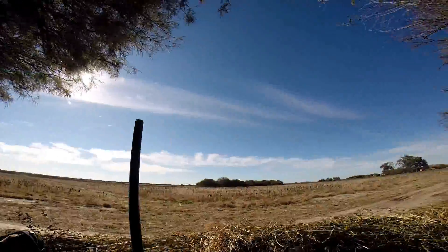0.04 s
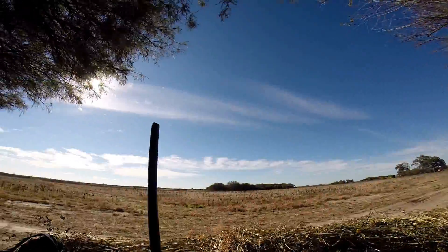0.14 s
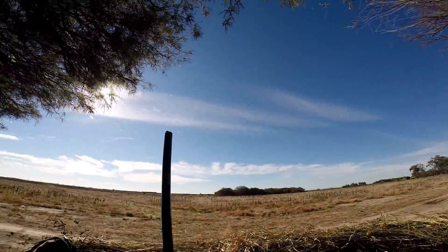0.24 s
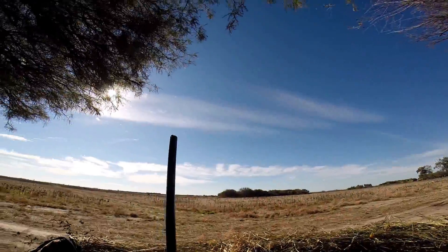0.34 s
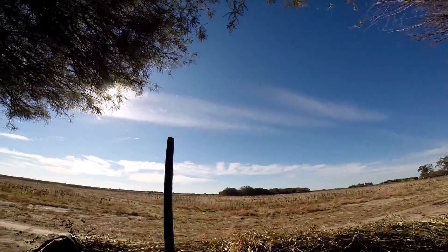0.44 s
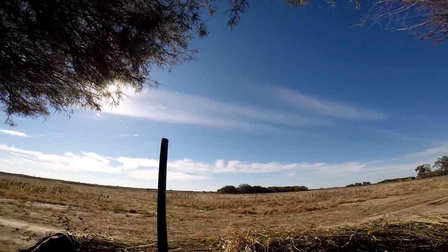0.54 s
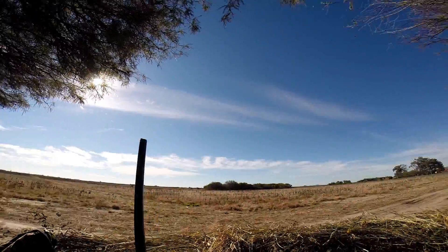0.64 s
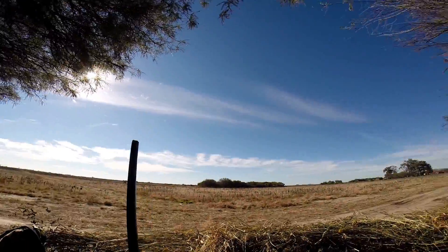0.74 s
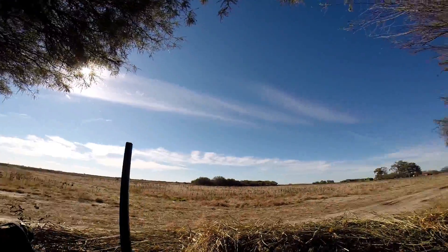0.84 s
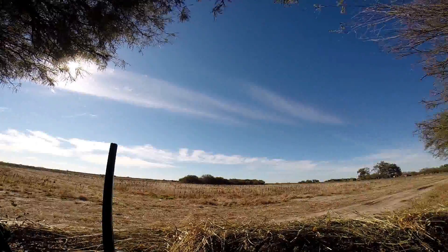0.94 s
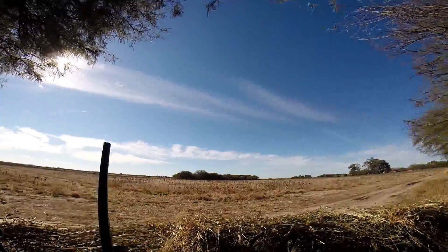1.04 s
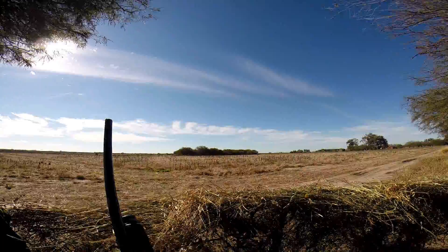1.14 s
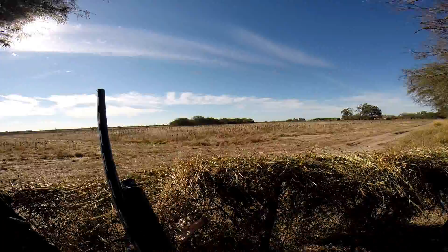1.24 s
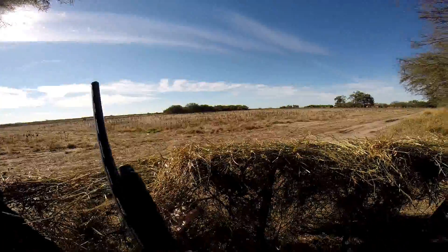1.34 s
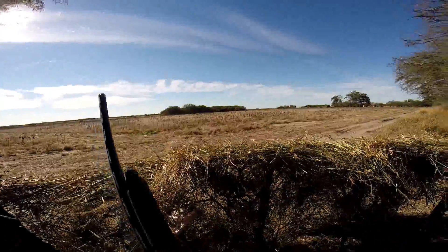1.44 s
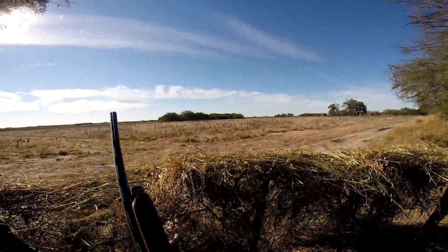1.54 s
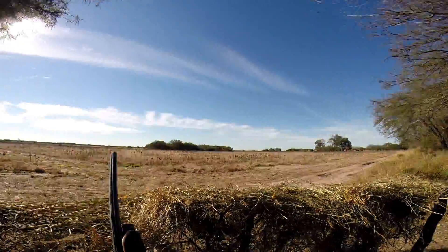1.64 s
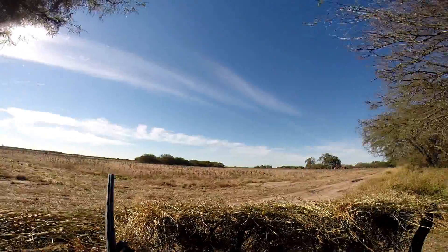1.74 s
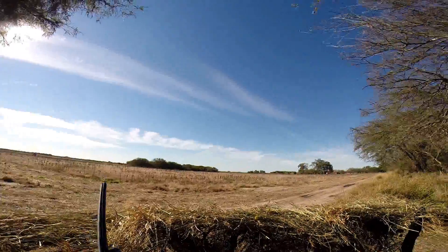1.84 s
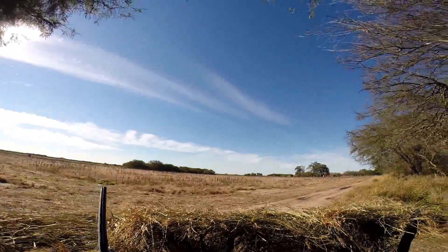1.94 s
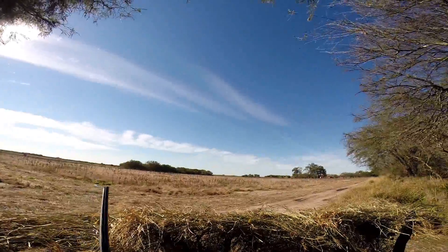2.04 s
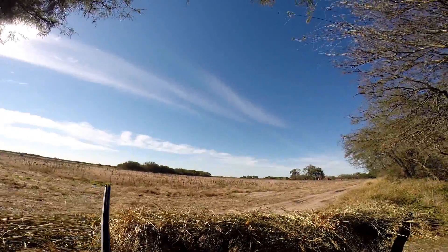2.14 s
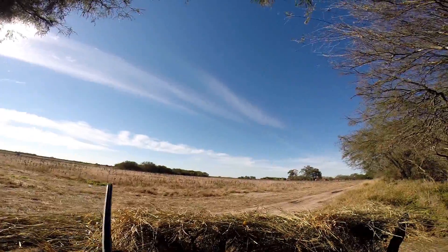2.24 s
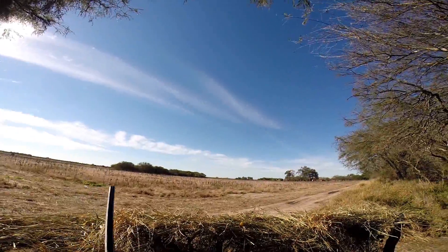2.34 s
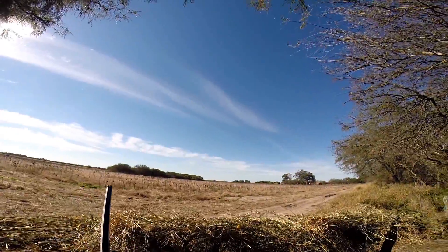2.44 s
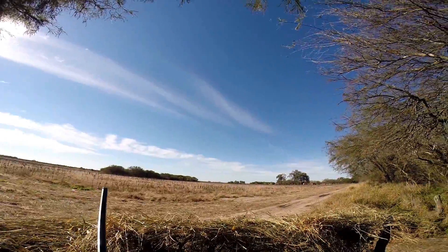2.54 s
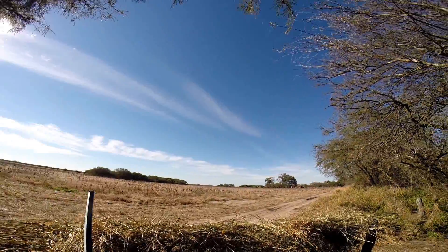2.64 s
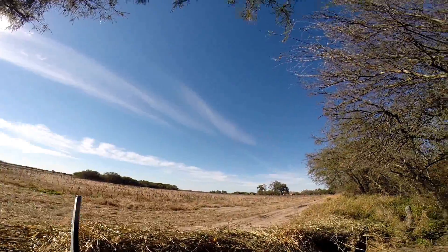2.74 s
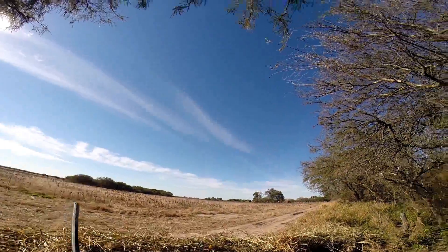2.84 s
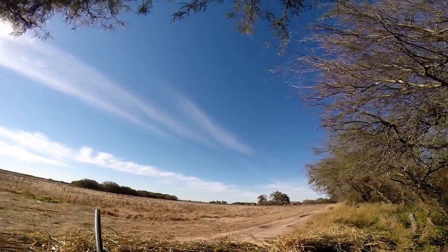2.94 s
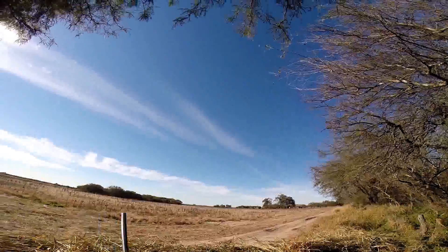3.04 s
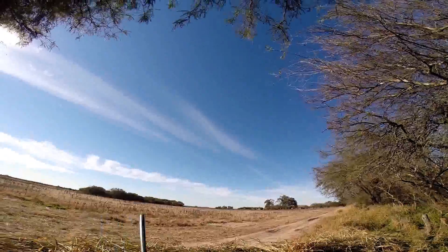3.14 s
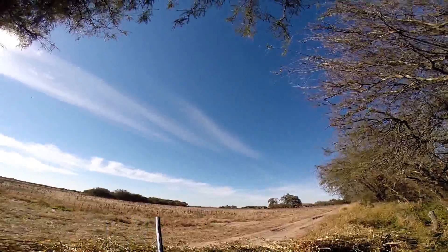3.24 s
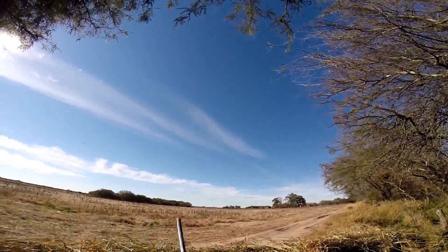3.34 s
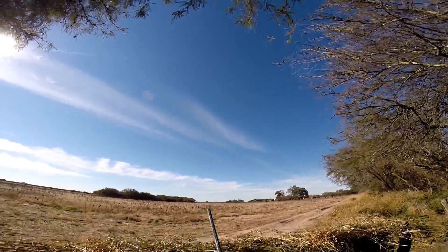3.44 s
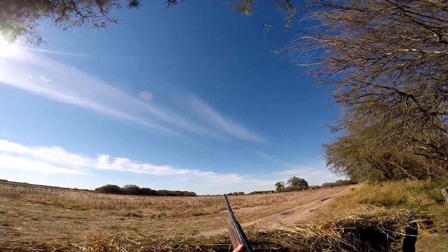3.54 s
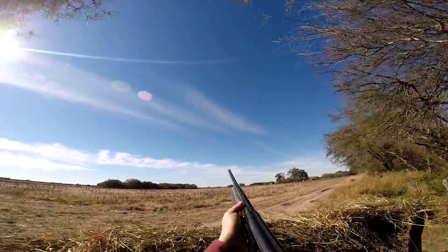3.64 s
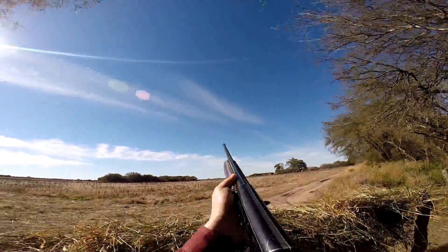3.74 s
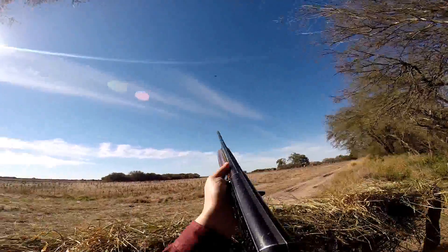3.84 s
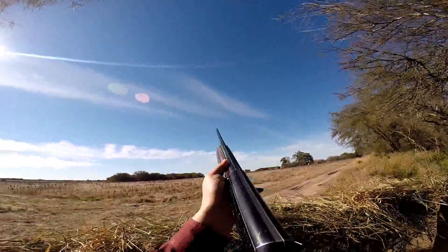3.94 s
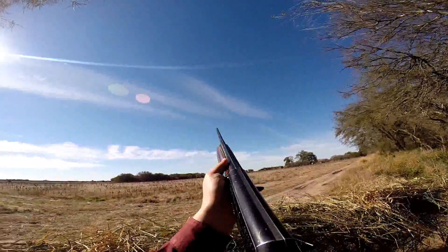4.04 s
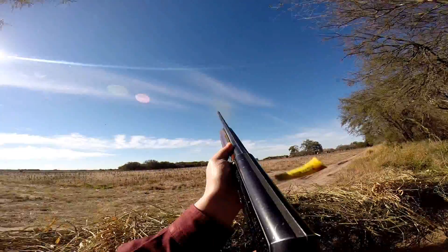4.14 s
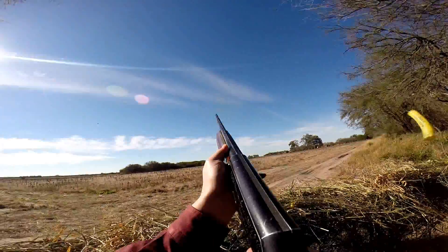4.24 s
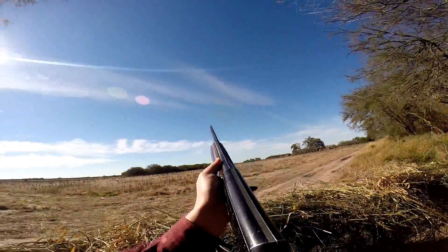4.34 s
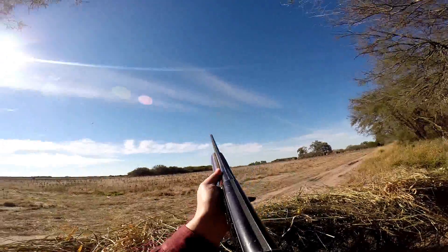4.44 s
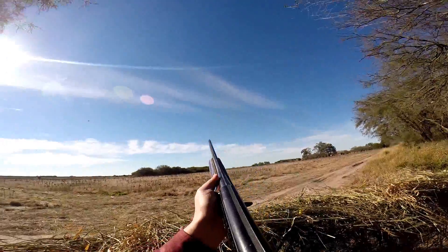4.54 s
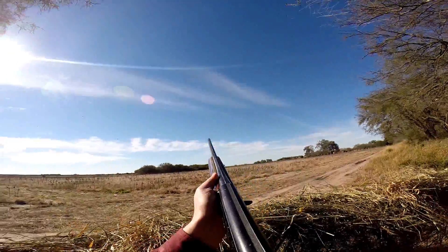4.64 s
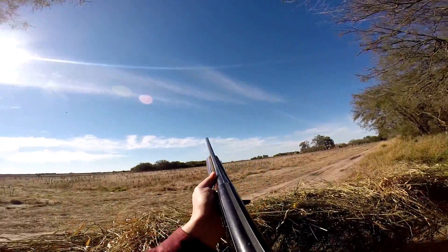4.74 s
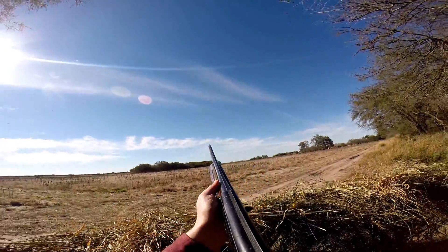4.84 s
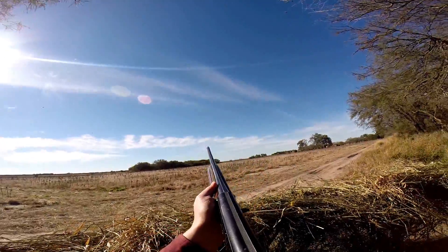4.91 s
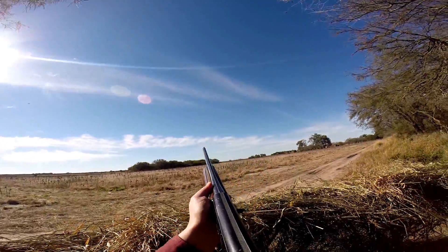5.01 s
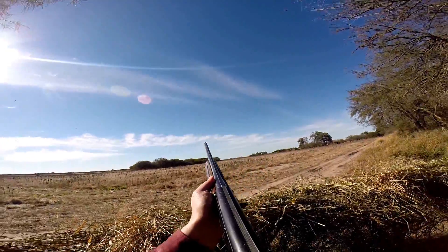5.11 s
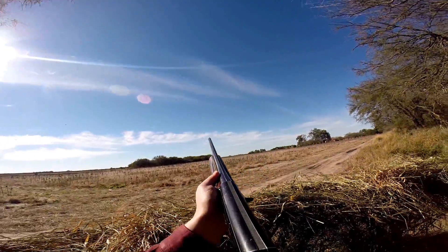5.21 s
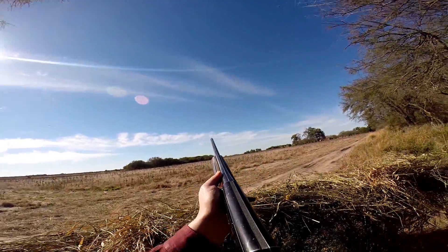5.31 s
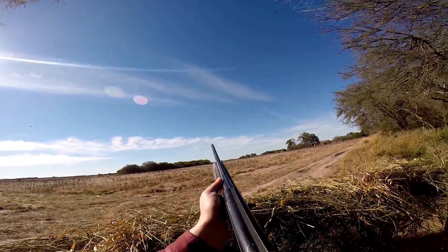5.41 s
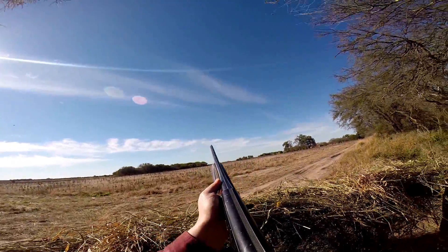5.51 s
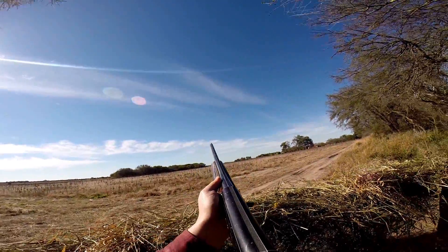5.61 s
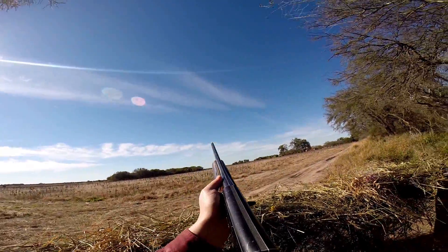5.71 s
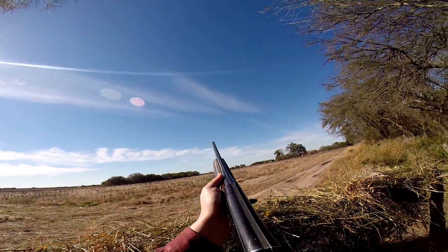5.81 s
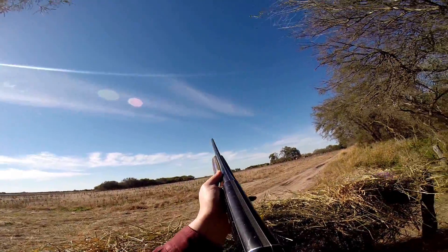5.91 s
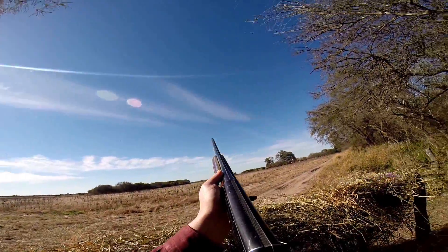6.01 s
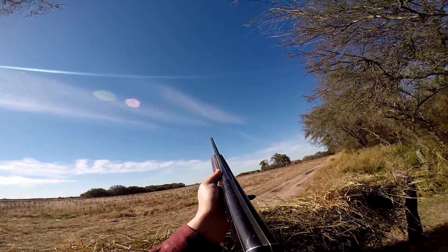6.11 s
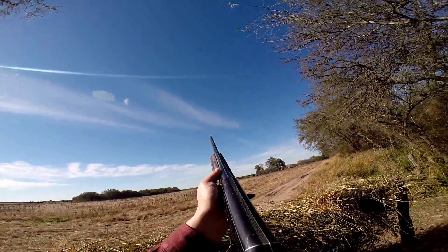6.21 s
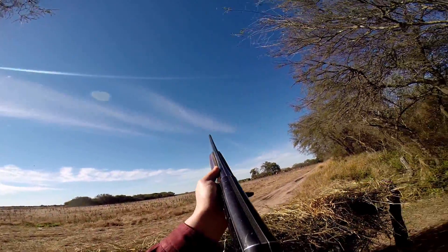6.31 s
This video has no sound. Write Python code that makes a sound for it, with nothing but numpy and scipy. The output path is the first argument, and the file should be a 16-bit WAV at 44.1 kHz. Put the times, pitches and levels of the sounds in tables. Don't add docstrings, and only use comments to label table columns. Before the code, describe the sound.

Muffled wind thumps and hiss in an open field; a far gunshot, small metal clicks, then a deafening close shotgun shot and settling rustle.

```python
import sys
import numpy as np
from scipy import signal
from scipy.fft import rfft, irfft
from scipy.io import wavfile
from scipy.ndimage import uniform_filter1d

SR = 44100
rng = np.random.default_rng(int(sys.argv[2]) if len(sys.argv) > 2 else 0)


def nominal_scale(level):
    x = np.asarray(level, float) / 20
    return 10 ** x


def unload_wav(signal):
    wavfile.write(
        sys.argv[1],
        SR,
        np.round(np.clip(np.atleast_2d(signal).T, -1, 1) * 32767).astype(np.int16),
    )


N = 280901

# pitch_hz, width_hz, level_db
HOUSING_MODES = [(200, 170, -10), (850, 350, -5), (1600, 330, -5.5), (2410, 410, -0.5), (2890, 300, -0.5),
                 (3700, 570, -2.5), (4640, 480, -6.5), (5880, 900, -6.5), (6500, 900, -22.5),
                 (7350, 430, -20), (8300, 190, -22.5), (9900, 1300, -17), (10950, 2300, -22.5),
                 (13000, 4600, -32.5)]
# start_s, level_db, length_ms, strongest pitch_hz, fall_db_per_octave
BLAST_FRONTS = [
    (4.22595, 0, .05, 3000, 1.5),
]
# start_s, level_db, length_ms
PUSHES = [
    (1.322, -35.5, 1.1),
    (4.2292, -1, 0.19),
    (4.2297, -13, 0.54),
]
# start_s, peak_db, hold_ms, t60_ms, pitch_hz
PANEL_RINGS = [(1.3216, -29, 1.1, 8.9, 850), (1.322, -24.5, 1.6, 9.7, 1630), (1.323, -42, 2.2, 25, 4750),
               (1.3345, -45, 4.2, 30, 5730), (1.3465, -43, 4, 30, 5560), (4.22654, -13, 1.1, 5, 2890),
               (4.22862, -2.5, 2.5, 8, 2890), (4.2292, -6.5, 2.1, 8, 4580), (4.2461, -8, 0, 7, 2890),
               (1.8648, -48.5, 2.5, 14, 960), (4.398, -41.5, 1, 18, 950), (2.3535, -61, 2.2, 22, 4530),
               (2.3625, -61, 4.5, 30, 3800), (2.4455, -60, 4.5, 30, 3800)]
# start_s, level_db, t60_ms, strongest pitch_hz
OWN_SHOT = [
    (4.22, -53.5, 22, 3500),
    (4.2241, -10, 36, 5600),
    (4.2266, -17.5, 20, 4000),
    (4.2286, -5.5, 24, 2600),
    (4.2335, -14, 7, 3600),
    (4.2372, -19, 11, 2000),
    (4.2462, -16, 20, 4000),
    (4.2488, -19, 38, 3600),
]
# start_s, level_db, t60_ms,
# strongest pitch_hz, fall_db_per_octave
FAR_SHOT = [
    (1.322, -32.5, 32, 2900, 23),
    (1.322, -36, 39, 4700, 2),
    (1.3345, -34, 62, 2970, 13),
    (1.334, -52, 52, 5000, 13),
    (1.3405, -36, 50, 2500, 25),
    (1.347, -37.5, 36, 1200, 26),
    (1.355, -34, 32, 2900, 34),
    (1.36, -42, 55, 1300, 13),
    (1.325, -46, 410, 2400, -0.5),
]
# start_s, level_db, t60_ms, strongest pitch_hz, fall_db_per_octave
FIELD_ECHOES = [
    (4.237, -27, 160, 3374, 0.65),
    (4.245, -33.5, 700, 2600, 3),
    (4.25, -35.5, 850, 1654, 10),
    (4.25, -34, 650, 5400, 4),
]
# start_s, level_db, t60_ms, strongest pitch_hz, fall_db_per_octave
ACTION = [
    (4.3125, -21, 55, 4640, 7),
    (4.3214, -8, 26, 3800, 9),
    (4.327, -13, 36, 4300, 6),
    (4.336, -27, 47, 2300, 0),
    (4.3985, -35, 24, 6000, 3),
    (5.032, -48.5, 27, 1500, 10),
    (5.043, -60, 25, 3515, 0.51),
]
# start_s, level_db, t60_ms, strongest pitch_hz, extra treble_db
CLICKS = [(0.225, -52.5, 20, 2900, 8), (1.8046, -44.5, 19, 3000, 21), (1.864, -34, 14, 1850, 22),
          (2.2289, -31.5, 11, 2900, 5), (2.262, -32.5, 13.5, 3740, 0), (2.4012, -38.5, 15, 3800, 8),
          (2.437, -47, 30, 3700, 15), (2.4551, -38, 23, 3100, 10), (2.6288, -41.5, 12, 3000, -6),
          (2.6358, -45, 8, 3070, 3), (2.6503, -48.5, 10, 2800, -3), (2.682, -55, 30, 2400, 12)]
# start_s, level_db, t60_ms, strongest pitch_hz
SNAPS = [(0.072, -49, 30, 2280), (0.0954, -50, 25, 2860), (1.1675, -46, 22, 1750), (1.187, -57, 30, 2320),
         (1.641, -52, 45, 2600), (1.6906, -56, 40, 3300), (1.7044, -60, 60, 3700), (1.835, -51, 20, 2500),
         (2.0564, -53.5, 40, 2890), (2.239, -52, 82, 2700), (2.3044, -55, 22, 2900), (2.351, -53, 39, 3930),
         (2.447, -55, 100, 3750), (2.405, -53, 60, 1600), (2.415, -54, 25, 2900), (2.4684, -52, 23, 3300),
         (2.607, -59, 70, 2500), (3.8705, -52, 18, 1980), (3.9823, -51, 26, 1970)]
# start_s, level_db, t60_ms, strongest pitch_hz,
# fall_db_per_octave
SLOW_SWELLS = [
    (1.97, -60.5, 540, 2980, 19),
    (5.13, -61.5, 800, 1974, 3.5),
]
# peak_s, peak_db, half_length_s
RUSTLE = [
    (0, -69.5, .1),
    (.45, -74, 0.3),
    (1.75, -68.5, 0.28),
    (2.4, -70.5, 0.16),
    (3.8, -68.5, .2),
    (5, -73.5, .4),
]
# peak_s, peak_db, half_length_s
GUSTS = [(0, -47.5, 0.048), (.25, -47, 0.14), (.52, -48.5, .1), (.86, -50.5, 0.13), (1.28, -44.5, .07),
         (1.79, -40.5, 0.041), (1.7, -48, 0.14), (2.09, -49.5, 0.032), (2.26, -48, 0.027),
         (2.37, -49.5, 0.046), (2.49, -45.5, 0.056), (2.8, -51, 0.088), (2.95, -49.5, .06),
         (3.12, -51.5, 0.086), (3.48, -34, 0.024), (3.41, -44.5, 0.04), (3.6, -42, 0.056), (3.88, -41, 0.2),
         (4.17, -42, 0.14), (4.6, -47, 0.21), (5, -47.5, .2), (5.35, -48, .12), (5.61, -48.5, 0.039),
         (5.77, -45.5, .06), (5.92, -47.5, .04), (6.06, -45, 0.039), (6.2, -52, .12)]
# pitch_hz, level_db (per Hz)
THUMP_SPECTRUM = [(5.9, -29.5), (10, 1), (23, -2), (47, -1.5), (61, -13), (86, -25), (130, -30), (170, -60),
                  (290, -120)]
# pitch_hz, level_db, wobble_radians, wobble_rate_hz
WHINES = [
    (5846, -88, 0, 30),
    (8780, -83, 0, 30),
    (11712, -83.5, 1.1, 29),
]
# pitch_hz, level_db (per Hz)
HISS_SPECTRUM = [(41, -29.5), (70, -2), (90, -6.5), (230, -10), (800, -17.5), (1700, -21), (3500, -27),
                 (6000, -33), (8500, -38), (11000, -42), (13000, -42.5), (15400, -53.5)]
# time_s, level_db
HUSH = [
    (4.207, 0),
    (4.21, -14),
    (4.226, -14),
    (4.23, 0),
]


def evened(x):
    return x / np.sqrt(np.mean(x ** 2) + 1e-20)


def add(mix, start_s, sound):
    part = mix[round(start_s * SR):][:len(sound)]
    part += sound[:len(part)]


def curve(rows):
    return np.interp(np.arange(N) / SR, *np.transpose(list(rows)))


def coloured(spectrum):
    hz = np.fft.rfftfreq(N, 1 / SR)
    point_hz, level_db = np.transpose(spectrum)
    gain = nominal_scale(np.interp(np.log(hz + 1), np.log(point_hz + 1), level_db))
    return evened(irfft(rfft(rng.standard_normal(N)) * gain, N))


def swells(rows, bed_db):
    t = np.arange(N) / SR
    power = nominal_scale(bed_db) ** 2
    for peak_s, peak_db, half_s in rows:
        power = power + nominal_scale(peak_db) ** 2 * np.exp(-((t - peak_s) / half_s) ** 2)
    return np.sqrt(power)


def mode(x, hz, width_hz):
    r = np.exp(-np.pi * width_hz / SR)
    feedback = [1, -2 * r * np.cos(2 * np.pi * hz / SR), r * r]
    return signal.lfilter([(1 - r * r) / 2, 0, (r * r - 1) / 2], feedback, x)


def housing(x, centre_hz=2400, fall_db=3):
    out = 0
    for hz, width_hz, level_db in HOUSING_MODES:
        gain = nominal_scale(level_db - fall_db * abs(np.log2(hz / centre_hz)))
        out = out + gain * mode(x, hz, width_hz)
    return out


def burst(noise, lumps, level_db, rise_ms, t60_ms, centre_hz, fall_db, treble_db=0, blur=1):
    scatter_db, bass_loss_db, treble_dies = 1.5, -7, 0.36
    t_ms = np.arange(int((rise_ms + 1.2 * t60_ms + 15) * SR / 1000)) / SR * 1000
    rise = np.sin(np.pi / 2 * np.minimum(t_ms / rise_ms, 1)) ** 2
    after_ms = np.maximum(t_ms - rise_ms, 0)
    drive = noise[:len(t_ms)] * nominal_scale(scatter_db * lumps[:len(t_ms)])
    out, power = 0, 0
    for hz, width_hz, mode_db in HOUSING_MODES:
        mode_db = mode_db - fall_db * abs(np.log2(hz / centre_hz))
        mode_db = mode_db + treble_db * (hz > 6000) + bass_loss_db * (hz < 1200)
        share = nominal_scale(mode_db) * np.sqrt(width_hz)
        shape = rise * nominal_scale(-60 * after_ms / t60_ms * (hz / 3000) ** treble_dies)
        ring = mode(drive * shape, hz, blur * width_hz)
        ring = mode(ring, hz, blur * width_hz)
        out = out + share * ring * np.linalg.norm(shape) / np.linalg.norm(ring)
        power += share ** 2
    return nominal_scale(level_db) * out / np.sqrt(power)


def bursts(rows):
    out = np.zeros(N)
    noise = rng.standard_normal(N + 2 * SR)
    lumps = evened(uniform_filter1d(rng.standard_normal(N + 2 * SR), 90))
    for k, (start_s, *settings) in enumerate(rows):
        first = round(start_s * 100) * SR // 100 + 97 * k
        add(out, start_s, burst(noise[first:], lumps[first:], *settings))
    return out


def swelling(rows, *colour):
    timed = []
    for start_s, level_db, t60_ms, *own in rows:
        rise_ms = .45 + .018 * t60_ms
        timed.append((start_s, level_db, rise_ms, t60_ms, *own, *colour))
    return bursts(timed)


def blasts():
    own = swelling(OWN_SHOT, 3.5, 2, 1.3)
    far = swelling(FAR_SHOT, -5)
    field = swelling(FIELD_ECHOES, 0, 2.1)
    return own + far + field


def fronts():
    click_lag_s, click_gain_db, click_ms, click_fall_db = .0008, 1.5, .13, 11
    rows = list(BLAST_FRONTS)
    for start_s, level_db, _, hz, _ in CLICKS:
        rows.append((start_s + click_lag_s, level_db + click_gain_db, click_ms, hz, click_fall_db))
    out = np.zeros(N)
    for start_s, level_db, length_ms, centre_hz, fall_db in rows:
        u = np.arange(1500) / SR * 1000 / length_ms
        ring = housing((1 - u) * np.exp(-u), centre_hz, fall_db)
        add(out, start_s, nominal_scale(level_db) * ring / abs(ring).max())
    return out


def pushes():
    out = np.zeros(N)
    for start_s, level_db, length_ms in PUSHES:
        u = np.arange(1500) / SR * 1000 / length_ms
        add(out, start_s, -nominal_scale(level_db) * 2 * u * (2 - u) * np.exp(-u))
    return out


def panel_rings():
    rise_ms = 1.
    t_ms = np.arange(2000) / SR * 1000
    rise = np.sin(np.pi / 2 * np.minimum(t_ms / rise_ms, 1)) ** 2
    out = np.zeros(N)
    for start_s, peak_db, hold_ms, t60_ms, hz in PANEL_RINGS:
        shape = rise * nominal_scale(peak_db - 60 * np.maximum(t_ms - rise_ms - hold_ms, 0) / t60_ms)
        add(out, start_s, shape * np.sin(2 * np.pi * hz * t_ms / 1000))
    return out


def action():
    return swelling(ACTION, 7)


def steel():
    start_s, level_db, hz, width_hz, hold_s, t60_s = 4.25, -47, 4670, 240, .06, .55
    since = np.arange(N) / SR - start_s
    hum = mode(rng.standard_normal(N), hz, width_hz)
    hum = evened(mode(hum, hz, width_hz))
    return hum * (since > 0) * nominal_scale(level_db - 60 * np.maximum(since - hold_s, 0) / t60_s)


def ticks():
    tick_rise_ms, slow_rise_ms = .4, 36
    rows = []
    for start_s, level_db, t60_ms, hz, treble_db in CLICKS:
        rows.append((start_s, level_db, tick_rise_ms, t60_ms, hz, 11, treble_db, 1.25))
    for start_s, level_db, t60_ms, hz in SNAPS:
        rows.append((start_s, level_db, tick_rise_ms, t60_ms, hz, 19, 3))
    for start_s, level_db, *rest in SLOW_SWELLS:
        rows.append((start_s, level_db, slow_rise_ms, *rest))
    return bursts(rows)


def rustle():
    size = nominal_scale(3. * np.minimum(rng.exponential(1, N), 3.5))
    struck = rng.random(N) < 4000 / SR
    grains = rng.standard_normal(N) * size * struck
    return swells(RUSTLE, -74) * evened(housing(grains))


def sway():
    hz, start_s, peak_s, peak_db, build_s = 39, 4.2621, 4.3, -19.5, .02
    sag_db_per_s, stop_s, stop_db_per_s = 70, 4.385, 600
    t = np.arange(N) / SR
    since = t - peak_s
    level_db = peak_db - np.where(since < 0, 4.3 * (since / build_s) ** 2, sag_db_per_s * since)
    level_db = level_db - stop_db_per_s * np.maximum(t - stop_s, 0)
    return nominal_scale(level_db) * np.sin(2 * np.pi * hz * (t - start_s))


def wind():
    thumps = coloured(THUMP_SPECTRUM)
    power = uniform_filter1d(uniform_filter1d(thumps ** 2, 2500), 2500)
    thumps /= np.sqrt(power + .05)
    return swells(GUSTS, -57.5) * thumps


def electronics():
    t = np.arange(N) / SR
    sound = nominal_scale(-58) * coloured(HISS_SPECTRUM)
    for hz, level_db, wobble, rate_hz in WHINES:
        phase = 2 * np.pi * hz * t + wobble * np.sin(2 * np.pi * rate_hz * t)
        sound = sound + np.sqrt(2) * nominal_scale(level_db) * np.sin(phase)
    return nominal_scale(curve(HUSH)) * sound


def scene():
    shots = blasts() + fronts() + pushes() + panel_rings()
    gun = action() + steel() + ticks()
    background = rustle() + sway() + wind() + electronics()
    return (shots + gun + background)[None]


def roll_off(x):
    return signal.sosfilt(signal.butter(12, 15590, fs=SR, output="sos"), x)


def record(dry):
    duck_s, snap_s, sag_s, recover_s = 4.2322, .0023, .29, .84
    times_s = duck_s + np.cumsum([0, snap_s, sag_s, recover_s])
    gain_db = curve(zip(times_s, [0, -8, -14, 0]))
    loud = dry * nominal_scale(gain_db)
    squeezed = loud / (1 + abs(loud) ** 4) ** (1 / 4)
    low_pass = signal.firwin(255, 15600, fs=SR)
    limited = signal.oaconvolve(squeezed, low_pass[None], "same")
    return roll_off(limited)


dry = scene()
out = record(dry)
unload_wav(out)
```